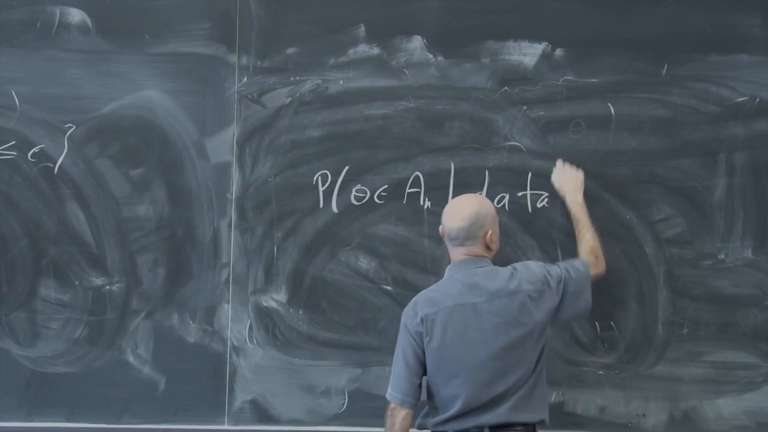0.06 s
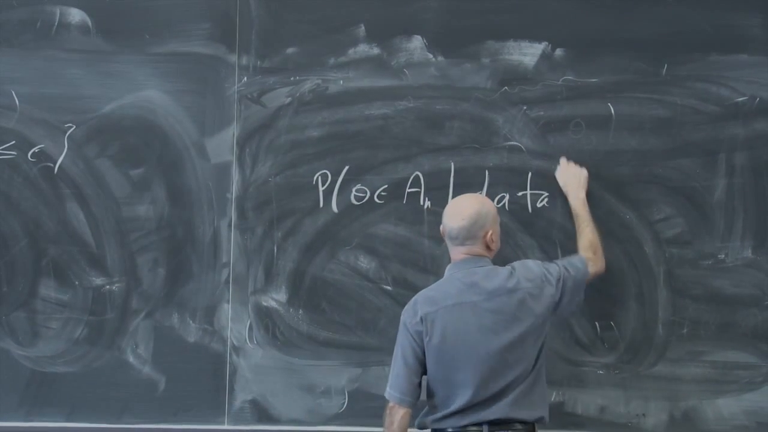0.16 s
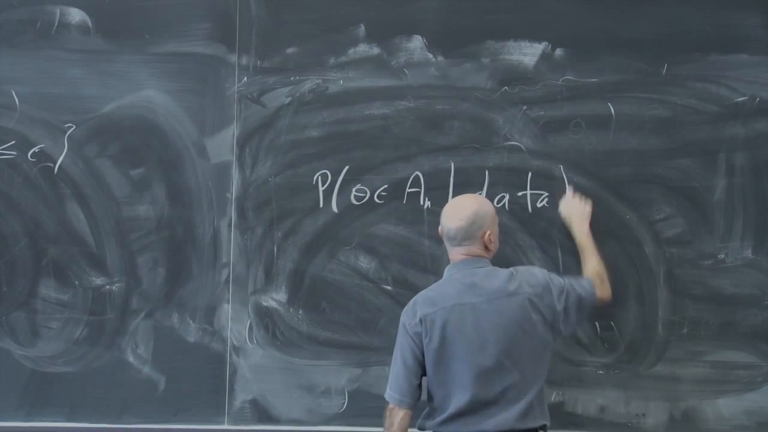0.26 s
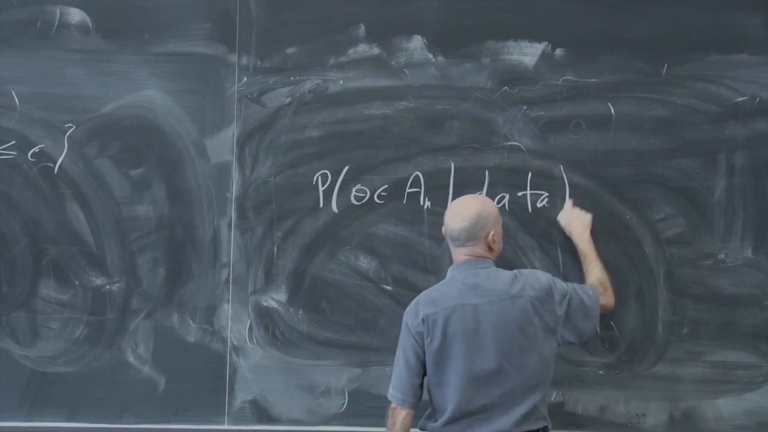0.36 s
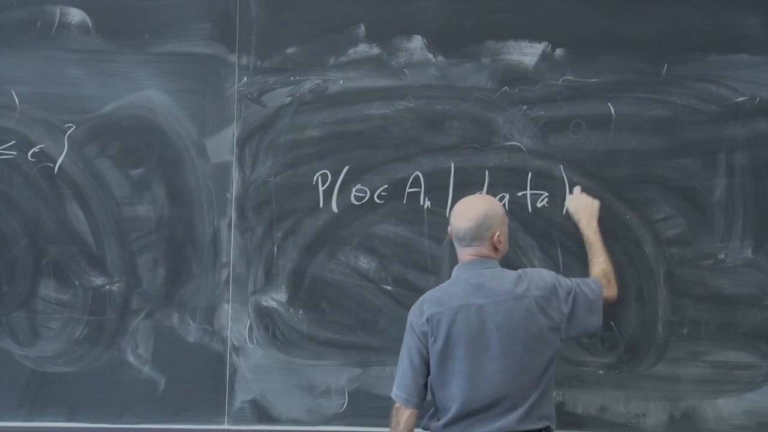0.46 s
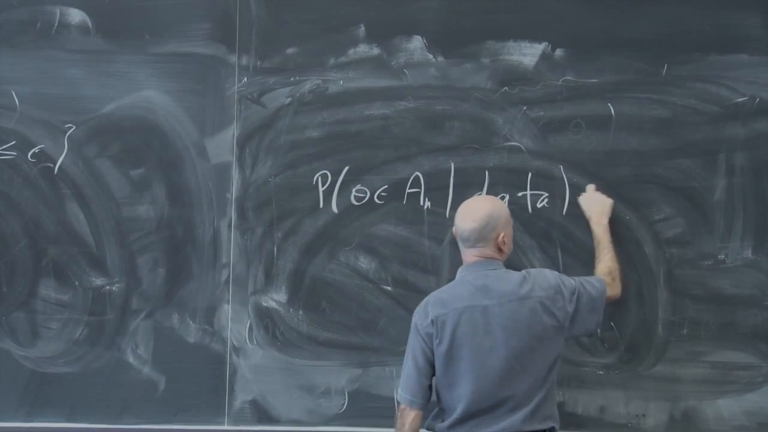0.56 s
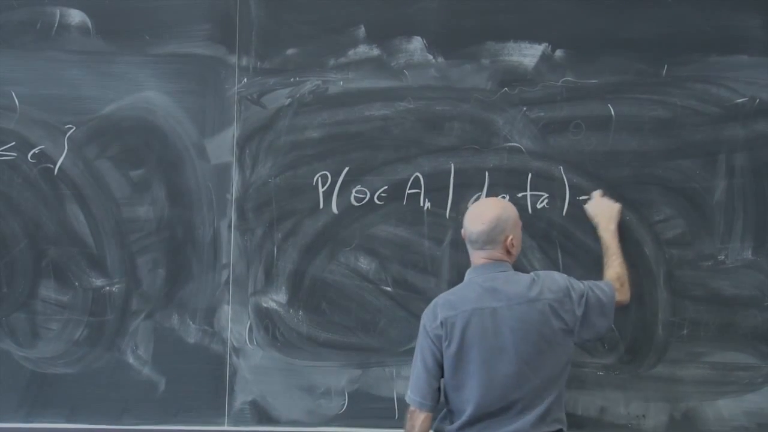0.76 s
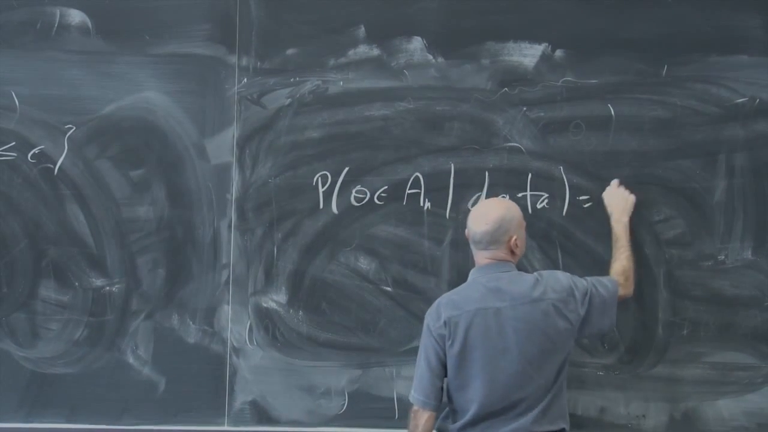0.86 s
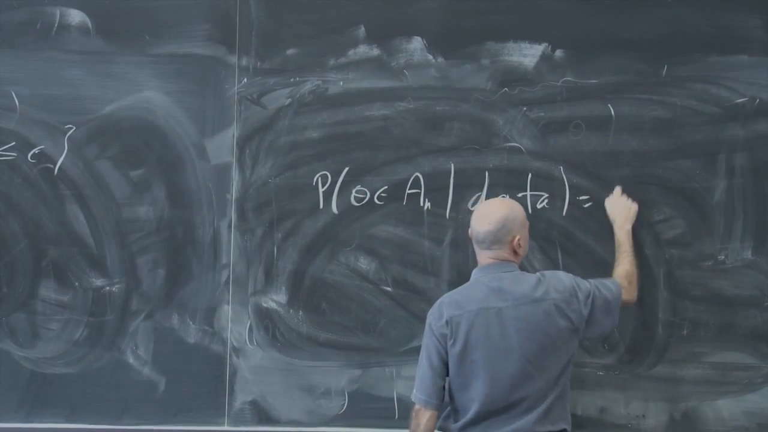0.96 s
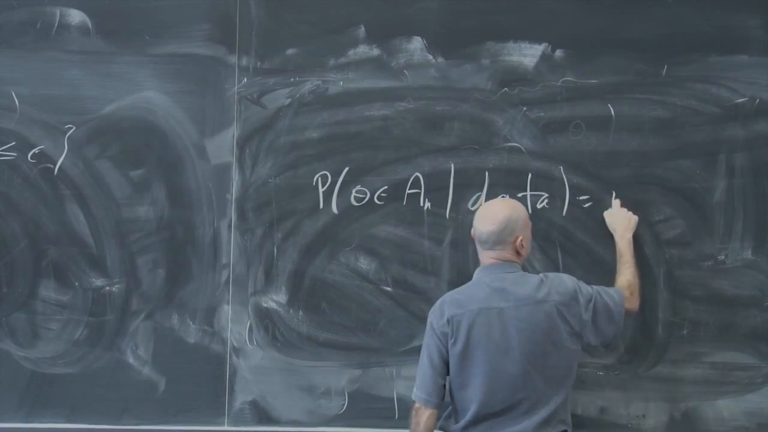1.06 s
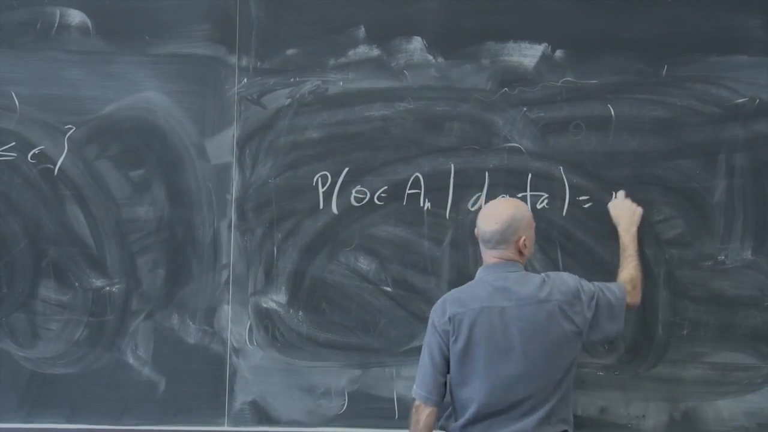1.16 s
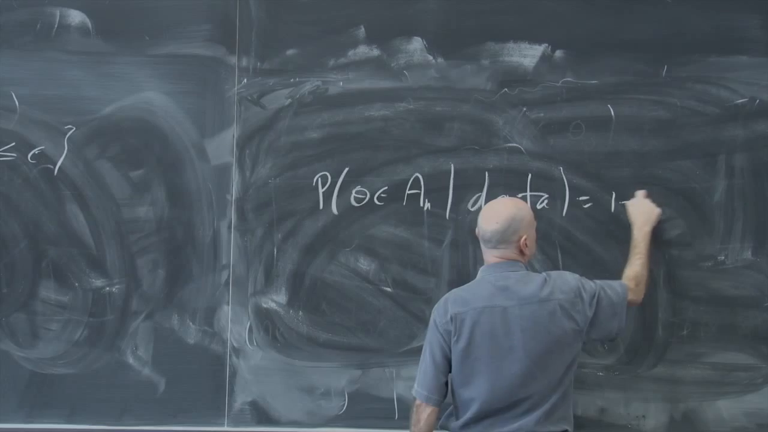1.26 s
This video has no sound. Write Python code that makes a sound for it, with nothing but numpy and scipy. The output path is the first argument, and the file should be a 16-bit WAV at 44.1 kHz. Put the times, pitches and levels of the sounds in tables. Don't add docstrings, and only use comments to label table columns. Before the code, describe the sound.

Chalk writing on a slate blackboard, close and toward the right. A faint scrape ends at the start, then the loudest tap at 0.22 s leads into a longer gritty, slightly squeaky drag until 0.45. Small ticks come near 0.5, a softer tap at 0.62, a bright one at 0.80, a dull one at 1.02, each with a short scrape. Short room echo, low ventilation rumble.

```python
import sys
import numpy as np
from scipy import signal
from scipy.fft import rfft, irfft
from scipy.io import wavfile

SR = 44100
rng = np.random.default_rng(int(sys.argv[2]) if len(sys.argv) > 2 else 0)


def level_to_linear(level):
    exponent = np.asarray(level, float) / 20
    return 10 ** exponent


def generate_wav(signal):
    frames = np.transpose(np.atleast_2d(signal))
    scaled = np.clip(frames, -1, 1) * 32767
    pcm = np.round(scaled).astype(np.int16)
    wavfile.write(sys.argv[1], SR, pcm)


N = 57330


def rms_one(x):
    return x / np.sqrt(np.mean(x ** 2) + 1e-20)


def outline(hz, points):
    points = np.array(points)
    return np.interp(np.log(hz), np.log(points[:, 0]), points[:, 1])


def colour(x, points):
    hz = np.arange(len(x) // 2 + 1) * SR / len(x) + 1
    return irfft(rfft(x) * level_to_linear(outline(hz, points)), len(x))


def resonate(x, hz, width_hz):
    r = np.exp(-np.pi * width_hz / SR)
    feedback = [1, -2 * r * np.cos(2 * np.pi * hz / SR), r * r]
    return signal.lfilter(np.array([1, 0, -1]) * (1 - r * r) / 2, feedback, x)


def resonate_twice(x, hz, width_hz):
    return resonate(resonate(x, hz, width_hz), hz, width_hz)


def place(out, s, sound):
    return out + np.pad(sound, (int(s * SR), N))[:N]


def slate_ring(bright_db, returns, t):
    # f/Hz, level/dB
    first_wave = [(60, -29), (250, -8.5), (900, 2.5), (1700, 0), (2600, -14.5), (4000, -31), (7000, -45.5),
                  (16000, -52)]
    bending_delay_s = 0.001088
    dulling_db_per_s_khz = 511
    hz = np.arange(len(t) // 2 + 1) * SR / len(t) + 1
    shape_db = outline(hz, first_wave) + bright_db * np.log2(np.clip(hz / 1000, 1, 4))
    first = level_to_linear(shape_db) * np.exp(-4j * np.pi * bending_delay_s * np.sqrt(1000 * hz))
    paths = 1
    for lag, strength in returns:
        dulling = level_to_linear(-dulling_db_per_s_khz * lag * hz / 1000)
        paths = paths + strength * dulling * np.exp(-2j * np.pi * hz * lag)
    ring = irfft(first * paths, len(t)) / np.abs(irfft(first, len(t))).max()
    return ring * np.clip(t / 0.00037, 0, 1) * (t < 0.1)


def panel_boom(modes, t):
    boom = 0
    for hz, level_db, t60 in modes:
        rise_s = 0.0016 + 0.67 / max(hz, 250)
        swell = 1 - np.exp(-(t / rise_s) ** 2)
        boom = boom + level_to_linear(level_db - 60 * t / t60) * np.sin(2 * np.pi * hz * t) * swell
    return boom


def chalk_edge(hz, t):
    crack = rng.standard_normal(len(t)) * level_to_linear(-60 * t / 0.0085)
    edge = resonate_twice(crack, hz, 3360) + level_to_linear(-12.5) * resonate(crack, 12700, 9100)
    return np.roll(edge, 22)


def taps():
    # t/s, peak level/dB, brightness/dB per octave, edge level/dB, edge f/Hz
    landings = [
        (0.2234, -17.5, 4, -20.5, 6400),
        (0.6193, -21.5, 4.5, -12.5, 4830),
        (0.7961, -18, 6, -12, 5340),
        (1.0178, -18, -5.5, -19.5, 3900),
    ]
    # delay/s, signed strength
    edge_returns = [
        [(.0011, 0.2), (.0022, 0.28), (.0041, 0.1), (.0063, 0.18), (.0076, 0.22), (.011, 0.14)],
        [(.0013, 0.093), (.0031, -0.63), (.0044, 0.2), (.0057, -0.62), (.0078, -0.22), (.012, 0.015)],
        [(.0010, 0.25), (.0021, 0.95), (.0035, 0.73), (.0045, 0.52), (.0079, .2), (.0118, 0.22)],
        [(.0010, 0.0015), (.0020, 0.36), (.0040, 0.14), (.0072, 0.25), (.009, -0.11), (.015, 0.22)],
    ]
    # f/Hz, level/dB, time to fall 60 dB/s
    panel_modes = [
        [(232, -0.5, 0.022), (380, -12, 0.037), (35.3, -36.5, 0.38), (1027, -9, .025), (1341, -9.5, 0.04),
         (1937, -23, 0.059), (2360, -7.5, 0.013), (3207, -8, .012)],
        [(268.5, -6, 0.056), (65.5, -20.5, 0.11), (481, -15.5, 0.037), (955, 5.5, 0.012), (1595, -16, 0.057),
         (2020, -11.5, 0.032), (2740, -15, 0.021), (3280, -9, 0.0079)],
        [(257.6, -3.5, 0.038), (57, -23.5, 0.11), (399, -20, 0.055), (1084, -2.5, 0.016), (1588, -19, 0.052),
         (2547, 0, 0.015), (3305, 2.5, 0.0088), (3956, -10.5, 0.0099)],
        [(282.7, -6, 0.047), (64.8, -24, 0.2), (486, -49, 0.024), (1130, -7, 0.015), (1550, -20, 0.012),
         (1990, -18, .015), (2760, -19, 0.019), (3460, -8, 0.0083)],
    ]
    out, t = np.zeros(N), np.arange(8192) / SR
    for landing, returns, modes in zip(landings, edge_returns, panel_modes):
        s, db, bright_db, edge_db, edge_hz = landing
        ring = slate_ring(bright_db, returns, t)
        boom = panel_boom(modes, t)
        edge = level_to_linear(edge_db) * chalk_edge(edge_hz, t)
        out = place(out, s, level_to_linear(db) * (ring + boom + edge))
    return out


def drags():
    # start t/s, rise/s, hold/s, fall/s, level/dB
    strokes = [
        (-.06, 0.026, 0.023, 0.068, -69.5),
        (0.246, 0.095, 0.058, 0.045, -60.5),
        (0.613, 0.027, 0.034, 0.071, -67.5),
        (0.821, 0.034, 0.01, 0.043, -65),
        (1.017, .07, 0.034, .035, -64.5),
    ]
    # f/Hz, level/dB
    scrape_colour = [(500, -16), (1300, 3), (2600, -18.5), (4500, -8), (6200, -18), (8300, -18.5),
                     (13300, -17.5), (15800, -21)]
    # f/Hz, width/Hz, level/dB
    squeaks = [(1935, 600, -0.5), (2526, 290, -3), (3100, 400, -12.5), (4050, 320, -34), (9540, 1300, -24)]
    grit_per_s, grit_spread_db = 11000, 2.5
    press_range_db, dust_db, dust_range_db = 13.5, -14, 10

    t, press, speed, full = np.arange(N) / SR, 0, 0, 0
    for s, rise, hold, fall, db in strokes:
        shape = np.interp(t, np.cumsum([s, rise, hold, fall]), [0, 1, 1, 0])
        press = press + level_to_linear(db - press_range_db * (1 - shape)) * np.minimum(10 * shape, 1)
        full = full + shape
        speed = speed + np.clip((t - s) / (rise + hold / 2), 0, 1) * (shape > 0)

    hits = (rng.random(N) < grit_per_s / SR) * rng.choice([-1, 1], N)
    grit = hits * level_to_linear(grit_spread_db * np.minimum(rng.exponential(1, N), 4))
    scrape = rms_one(colour(grit, scrape_colour))
    squeal = sum(level_to_linear(db) * rms_one(resonate_twice(grit, hz, width)) for hz, width, db in squeaks)
    dust = level_to_linear(dust_db - dust_range_db * (1 - full)) * rms_one(resonate_twice(grit, 13240, 3200))
    ridge = 0
    for k, hz in enumerate(np.linspace(1400, 2700, num=5)):
        share = np.clip(1 - np.abs(speed / 0.25 - k), 0, 1)
        ridge = ridge + share * rms_one(resonate(grit, hz, 600))
    return press * (scrape + 0.9 * squeal + level_to_linear(-4) * ridge + dust)


def ticks():
    # t/s, peak level/dB, centre f/Hz, width/Hz
    snaps = [
        (.008, -58, 1050, 300),
        (.2525, -63, 4500, 3000),
        (.482, -63, 4800, 2500),
        (.526, -57, 3400, 2600),
        (.5262, -64, 11000, 6000),
        (.8437, -44, 1500, 1200),
        (.9352, -53, 11500, 8000),
        (.9354, -63, 4500, 4000),
        (1.257, -67, 4800, 2500),
    ]
    snap_s = 0.001
    out, t = np.zeros(N), np.arange(400) / SR
    for s, db, hz, width in snaps:
        burst = rng.standard_normal(400) * t * np.exp(-t / snap_s)
        snap = resonate_twice(burst, hz, width)
        out = place(out, s - snap_s, level_to_linear(db) * snap / np.abs(snap).max())
    return out


def room(x):
    # f/Hz, level/dB
    echo_colour = [(100, 1.5), (260, -1), (550, -0.5), (1000, -3.5), (1800, -1.5), (3200, -5.5),
                   (6000, -8.5)]
    t = np.arange(SR) / SR
    noise = rms_one(colour(rng.standard_normal(SR), echo_colour)) * np.clip((t - 0.003) / 0.0077, 0, 1)
    late, early = level_to_linear(-60 * t / 0.53), level_to_linear(-60 * t / 0.013)
    fade = level_to_linear(-18) * late / np.linalg.norm(late) + level_to_linear(-0.5) * early / np.linalg.norm(early)
    return signal.fftconvolve(x, noise * fade)[:N]


def air():
    # f/Hz, level/dB
    air_colour = [(20, -4.5), (130, -0.5), (250, -8), (500, -23), (1200, -25), (2400, -36.5), (7000, -38),
                  (16000, -41)]
    # f/Hz, width/Hz, level/dB
    duct_modes = [(26.5, 9.8, -71), (118.2, 21.5, -69), (265, 45, -69)]
    rush = level_to_linear(-64.5) * rms_one(colour(rng.standard_normal(N), air_colour))
    noise = rng.standard_normal(N + SR)
    ducts = sum(level_to_linear(db) * rms_one(resonate(noise, hz, width)[SR:]) for hz, width, db in duct_modes)
    return rush + ducts


def scene():
    chalk = taps() + drags() + ticks()
    return np.tile(chalk + room(chalk) + air(), (2, 1))


def low_pass(x):
    return signal.sosfilt(signal.butter(12, 16440, fs=SR, output="sos"), x)


def record(dry):
    # f/Hz, level of left-right difference/dB
    pan_narrows = [(4000, 0), (8000, -2.5), (16000, -4)]
    hiss = level_to_linear(-105) * rng.standard_normal(dry.shape)
    left, right = dry * level_to_linear([[-2], [4]]) + hiss
    mid = (left + right) / 2
    side = colour((left - right) / 2, pan_narrows)
    top_cut = signal.cheby1(10, 1, 15500, fs=SR, output="sos")
    mix = signal.sosfilt(top_cut, [mid + side, mid - side])
    return low_pass(mix)


dry = scene()
out = record(dry)
generate_wav(out)
```